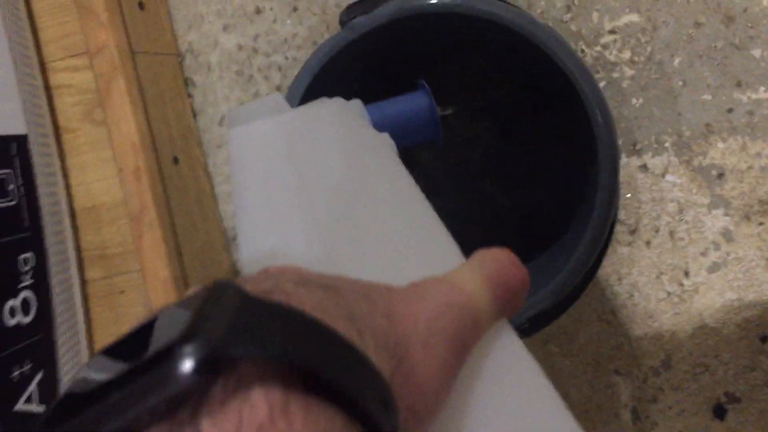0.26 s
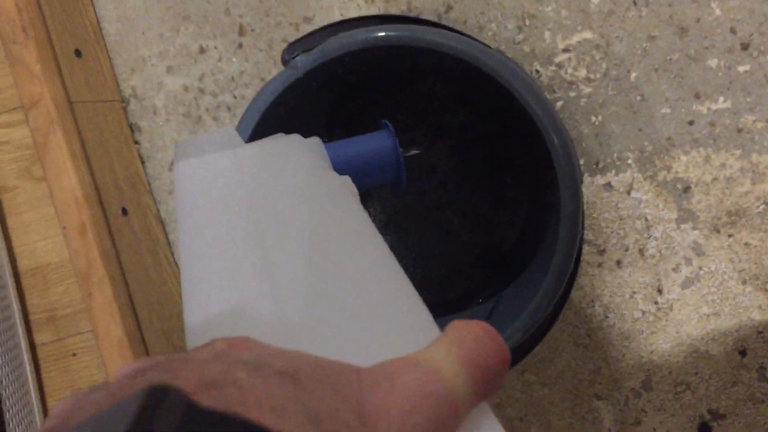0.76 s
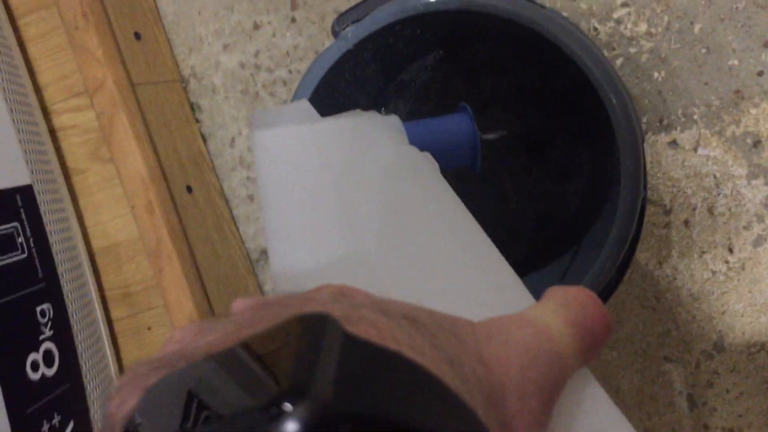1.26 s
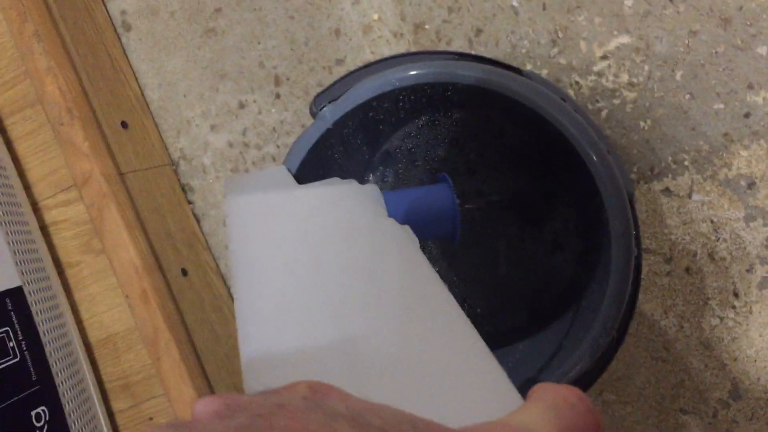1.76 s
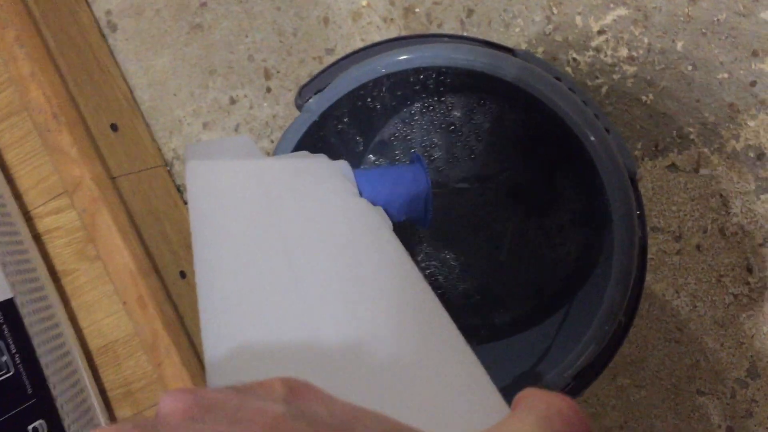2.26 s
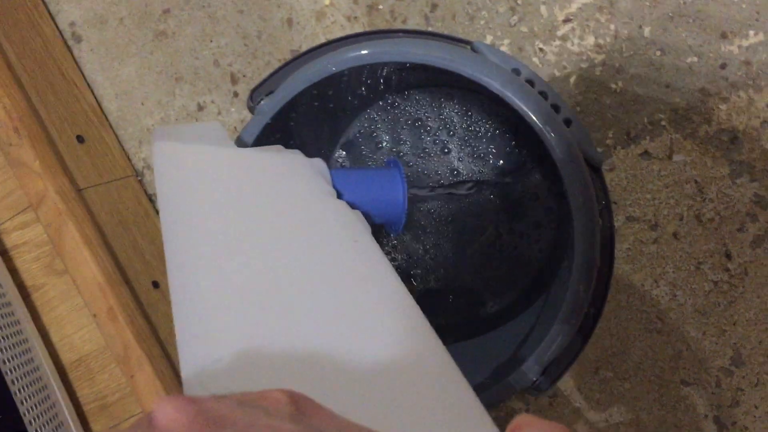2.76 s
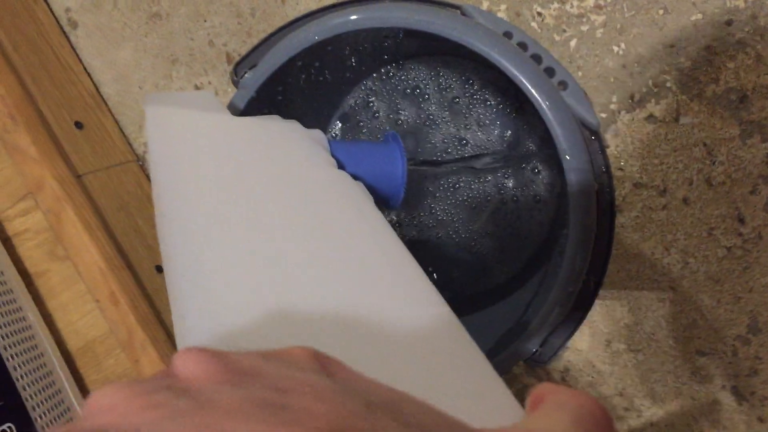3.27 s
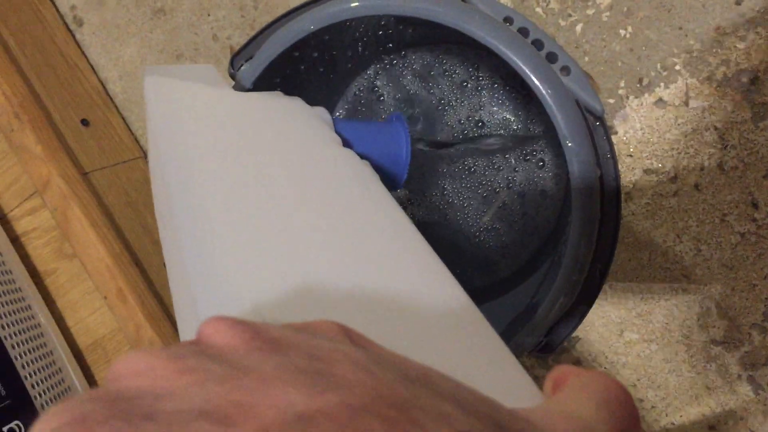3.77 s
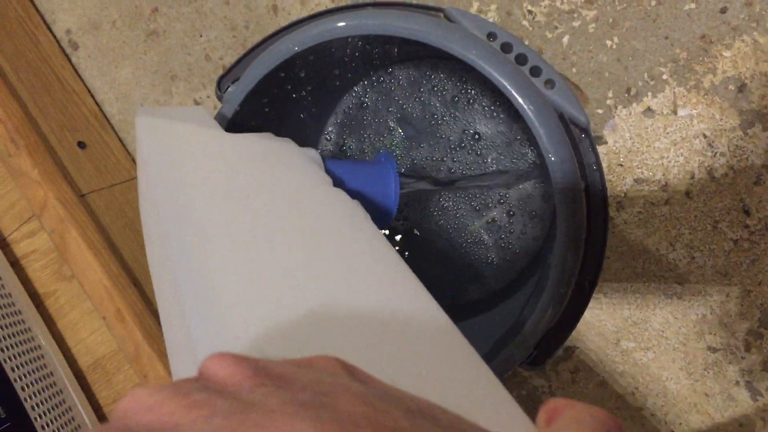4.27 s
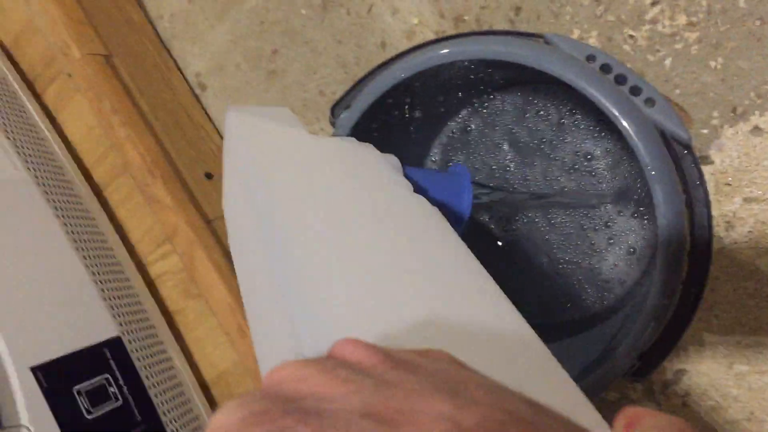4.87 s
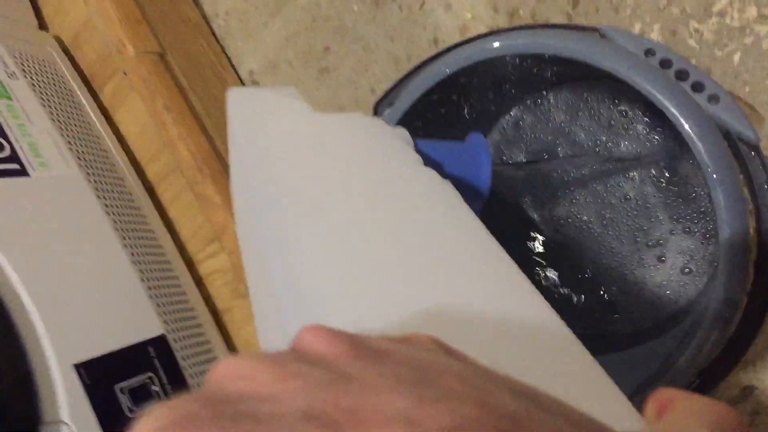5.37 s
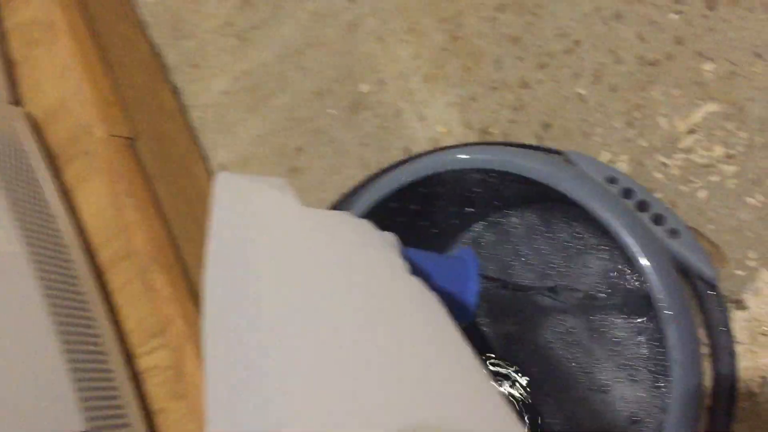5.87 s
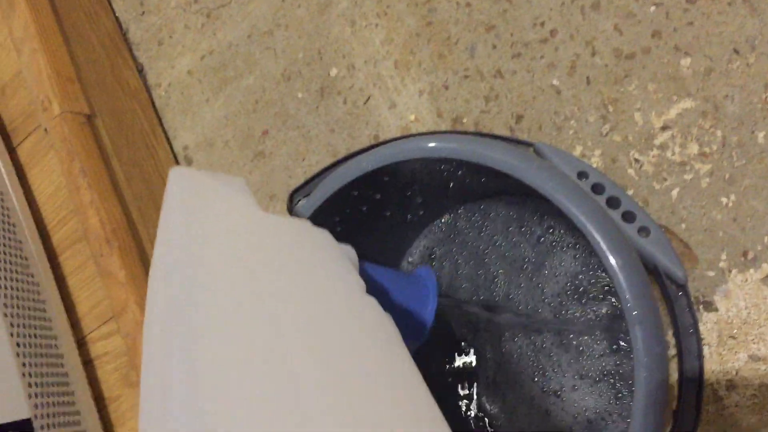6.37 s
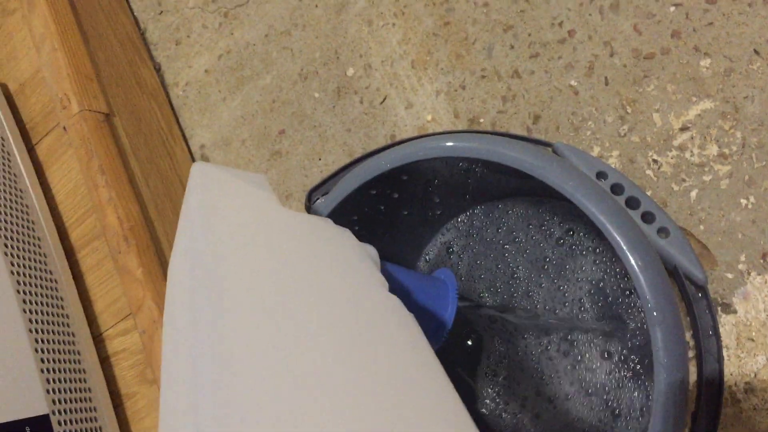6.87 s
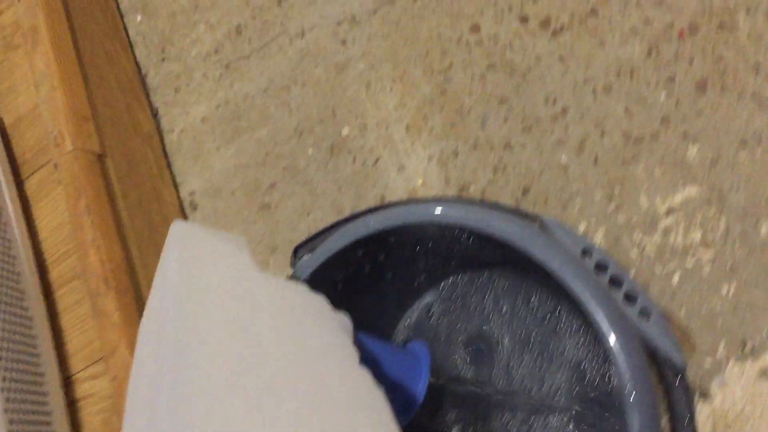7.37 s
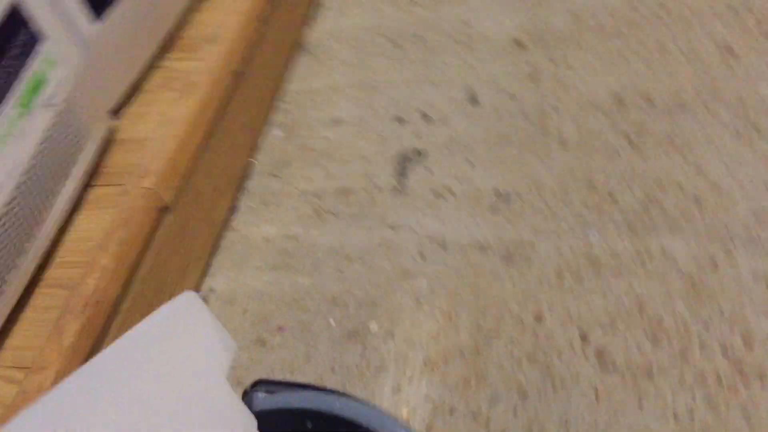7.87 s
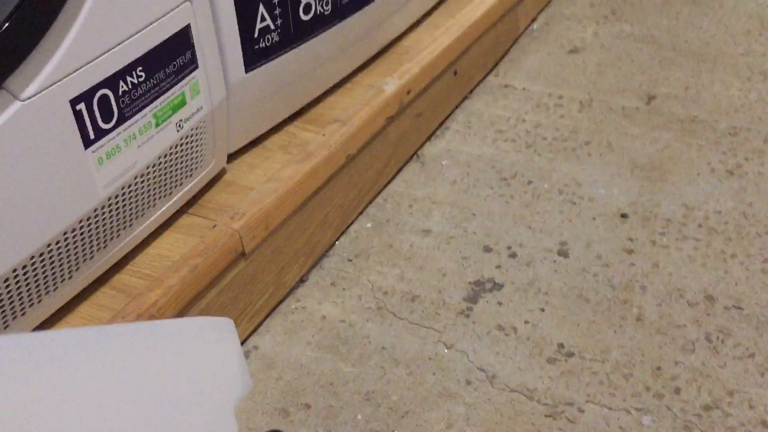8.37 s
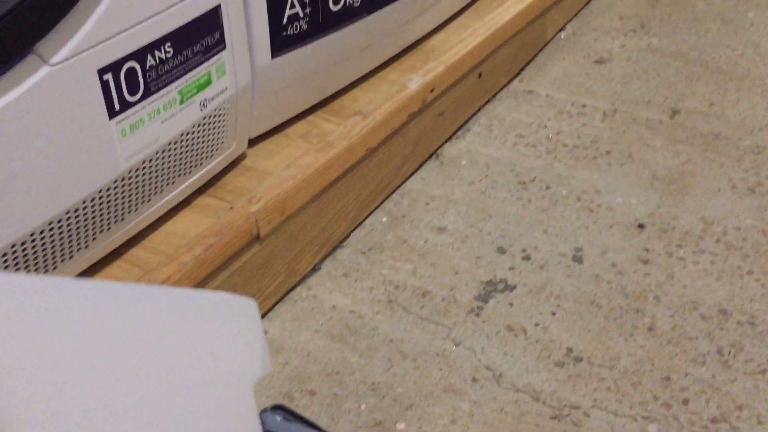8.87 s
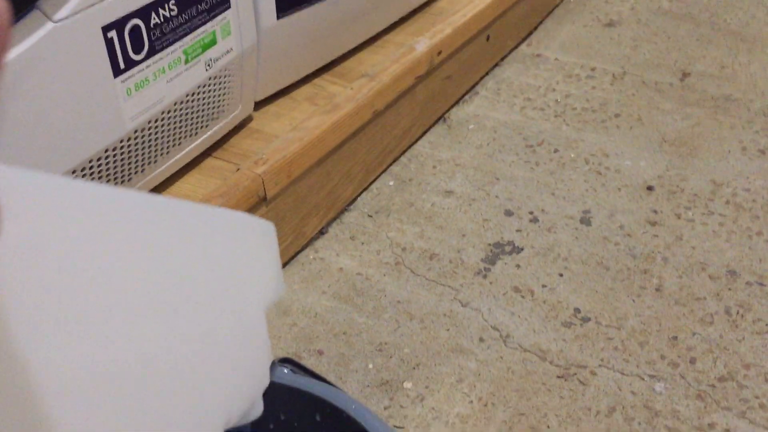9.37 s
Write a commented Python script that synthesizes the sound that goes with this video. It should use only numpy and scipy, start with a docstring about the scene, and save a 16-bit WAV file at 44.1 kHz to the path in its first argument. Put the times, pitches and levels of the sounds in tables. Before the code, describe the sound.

Close indoor pouring: splashy spurts rattle on a bare bucket bottom, become a gurgling trickle with rising bubbles, and break up into plopping drops.

```python
"""A broken dribble of water patters on the bare bottom of a plastic bucket on a concrete floor indoors.
Poured from a hollow plastic tank, it thickens to a stream and thins out to single drips.
Impacts throw decaying noise as spray and trap bubbles, each a decaying sine of rising pitch.
Two-pole resonances give the air modes of the bucket; low noise bursts give the bumps of the tank."""
import sys
import numpy as np
from scipy import signal
from scipy.fft import rfft, irfft, next_fast_len
from scipy.io import wavfile

SR = 44100
rng = np.random.default_rng(int(sys.argv[2]) if len(sys.argv) > 2 else 0)


def to_wav(sig):
    """Store sig (one row per channel, or 1-D mono) as 16-bit WAV at the path in sys.argv[1].

    Samples outside -1..1 are clipped; the rate is SR.
    """
    pcm = np.clip(np.atleast_2d(sig), -1, 1) * 32767
    pcm = np.round(pcm).astype(np.int16)
    wavfile.write(sys.argv[1], SR, pcm.T)  # frames by channels


N = 424683
T = np.arange(N) / SR   # time, s
TOP_HZ = .45 * SR   # highest band edge

# All source levels below hold before the colouring and the room.
# Steady part of the pour: [t/s, babble level/dB, fine spray level/dB]
FLOW = [(0.0, -50, -57.5), (0.35, -51, -59.5), (0.54, -49, -56.5), (0.749, -50, -60), (1.12, -50, -56.5),
        (1.71, -62.5, -68.5), (2.25, -52, -58.5), (3.86, -50, -57.5), (4.321, -52, -61), (4.64, -49, -55.5),
        (5.099, -53.5, -63), (5.58, -49, -53.5), (5.74, -52, -53.5), (6.84, -51, -59), (7.67, -54, -57),
        (8.29, -54, -73), (9.09, -70, -75), (9.63, -62, -53.5)]
FULL_FLOW_DB = -50   # babble level of the full stream
CALM_DB = 19   # this far under full flow the surface is calm: bubbles of large drops ring longer, chirp further
# Swells of the stream as the tank sloshes: [t/s at the crest, length/s, gurgle change/dB, splashing change/dB]
SURGES = [(0.143, 0.14, 10.5, 3.5), (0.52, 0.28, 15, 2.5), (0.73, 0.035, -6, 2.5), (1.006, 0.091, 5, 3.5),
          (1.38, 0.5, 1, 2.5), (1.93, 0.17, 0.5, 4), (2.447, 0.31, 12.5, 2.5), (2.99, 0.42, 6, 1),
          (3.445, 0.32, 8, 2.5), (3.815, 0.17, 14.5, 3), (4.09, 0.25, 12, 3.5), (4.79, 0.21, 19, 6),
          (5.363, 0.34, 16, 2), (5.65, 0.3, 15.5, 4), (6.26, 0.39, 8.5, 5.5), (6.535, 0.19, -1, 1),
          (6.95, .34, 9, 4), (7.425, 0.31, 10.5, 4.5), (7.693, 0.29, 18, 8), (8.18, 0.25, 21, 4),
          (8.52, 0.26, 1, 8.5), (8.76, .17, -15, 11.5), (9.102, 0.12, 4, 14.5), (9.506, 0.21, 18, 0)]
# Moments when the stream breaks off: [t/s in the middle, length/s]
GAPS = [(0.267, 0.079), (0.851, 0.062), (1.584, 0.052), (2.075, 0.06), (8.648, 0.14), (8.939, 0.14),
        (9.198, 0.1), (9.412, 0.03)]
GAP_DB = -11   # change of gurgle and splashing in mid-gap
SPRAY_SHARE, DRUM_SHARE = 0.53, 0.82   # share of a dB change in the spray (splashing) and deepest mode (gurgle)

# Lumps of water: rate at full flow (1/s), share of the flow's dB swing that changes the rate
IMPACTS_PER_S, IMPACTS_FOLLOW = 205, .35
GURGLE_DB, GURGLE_FOLLOWS = -62.5, 0.65   # big bubbles at full flow; share of the flow's dB swing
BABBLE_DB, SPRAY_DB = 4.5, 2   # over their flow curves
SHALLOW_OCTAVES, FILL_S = 0.87, 2.94   # shallow water: raised lowest bubble pitch, time constant of its fading
CHURN_DB, CHURN_T60_S = -7.5, .07   # torn water, against the babble at full flow; its decay time
MIST_DB, MIST_T60_S = -6.5, .03   # puffs of fine spray, against the spray level; their decay time
HISS_DB = -9   # bursting froth at full flow, against the spray level
THUD_DB = -78   # thud of air pushed by the lumps at full flow
# Spectrum of the running water: [f/Hz, gain/dB]
WATER = [(150, 12), (330, 4), (550, -1), (850, -5), (1300, -2), (1900, -0.5), (3300, 1), (4800, -7),
         (6800, -2.5), (8000, -4), (9200, -2.5), (10400, -9), (12000, -1.5), (15500, 0)]

# Modes of the bare bucket bottom: [f/Hz, width/Hz, gain/dB]
BOTTOM = [(1087, 84, -3), (1720, 98, -1), (2650, 170, -36)]
BOTTOM_DB, COVER_DB_PER_S = 2, 8   # level over the flow at first; its fall as water covers the bottom
# Higher air modes of the bucket: [f/Hz, width/Hz, gain relative to the direct sound/dB]
BUCKET = [(757, 52, 0.5), (1042, 63, 15), (1156, 200, 6), (1508, 168, 11.5), (1632, 74, 14),
          (2107, 390, 2.5), (2800, 290, -1.5), (3750, 560, 5)]
# Drumming of the stream on the deepest air mode, stronger as the bucket fills, weak in drips: [t/s, level/dB]
DEPTH = [(0, -74), (1.9, -68), (3.5, -61), (5.0, -61.5), (5.7, -58.5), (8.28, -59.5), (8.4, -83),
         (9.63, -90)]
DEEP_HZ, DEEP_WIDTH_HZ = 403, 26   # the deepest air mode
DRUM_DB, GLUG_BOOM_DB, PLOP_BOOM_DB = -9.0, -7.0, -21.5   # its drive: over DEPTH, a glug, a large drop
SLOSH_OCTAVES = .04   # scatter of its pitch from blow to blow as the surface heaves

# Bumps of the hollow tank: [t/s, peak level/dB, f/Hz, t60/s, wall rattle relative to the bump/dB]
BUMPS = [(0.024, -54.5, 132, 0.4, 8), (1.079, -37, 260, 0.21, -4), (1.108, -47, 181, 0.1, -18),
         (1.112, -50, 100, 0.12, -20), (2.38, -56, 226, 0.23, -15), (3.92, -57, 160.4, 0.28, -15),
         (4.128, -40, 224.2, 0.21, -1), (4.185, -45, 205.2, 0.18, -20), (5.273, -50.5, 129.3, 0.053, 14),
         (5.314, -47.5, 135, 0.1, -6), (7.798, -52, 258, 0.067, -11), (7.969, -55, 133.8, 0.083, -18)]
# Sharpest droplet ticks: [t/s, reference level/dB, f/Hz]
TICKS = [(0.0618, -31.5, 5900), (0.15, -30, 13300), (0.3444, -26, 9670), (0.4324, -22.5, 7600),
         (0.4567, -24, 13500), (0.4827, -19, 7600), (0.521, -30, 13120), (0.5363, -24.5, 6353),
         (0.604, -28, 6330), (0.637, -27, 14900), (0.7161, -18, 6300), (0.899, -33, 5850),
         (1.003, -32, 6740), (1.03, -32, 4680), (1.19, -32.5, 8910), (1.3314, -25, 8550),
         (1.3972, -34, 14200), (1.535, -38, 8100), (1.972, -32.5, 9300), (1.9878, -32.5, 5430),
         (2.152, -32.5, 9100), (2.205, -35, 9060), (2.4268, -28, 8490), (2.4606, -27, 9050),
         (2.476, -32, 12060), (2.493, -31, 11800), (2.569, -32, 8200), (2.632, -32, 8530),
         (2.85, -30, 11970), (3.335, -31, 7330), (3.493, -33, 6790), (3.785, -29.5, 9110),
         (3.8143, -29.5, 8240), (3.947, -30, 8740), (3.968, -30, 9480), (5.162, -31.5, 7720),
         (5.4232, -29, 12620), (5.536, -25.5, 12370), (5.691, -22, 12970), (5.732, -34, 8306),
         (6.281, -29, 6844), (6.415, -29.5, 8510), (6.6936, -28, 5956), (7.049, -26.5, 7000),
         (7.0978, -27.5, 11600), (7.2386, -27.5, 8500), (7.386, -29.5, 8345), (7.4799, -26.5, 6020),
         (7.6869, -28.5, 11410), (7.732, -32, 6230), (8.489, -36.5, 8890), (8.861, -40, 4700),
         (9.026, -38.5, 5800), (9.038, -40, 5123), (9.256, -36.5, 5070), (9.453, -33, 8530),
         (9.5307, -20.5, 11900), (9.6225, -28.5, 4920)]
STRAY_TICKS_PER_S, STRAY_TICK_DB = 4.5, 15.5   # lesser ticks: rate, mean level over the spray

# Largest drops: [t/s, reference level/dB, bubble f/Hz, splash level before its gain/dB]
PLOPS = [(0.0674, -28, 1800, -55.5), (0.1197, -28, 1070, -58), (0.143, -31, 1680, -52),
         (0.1818, -32.5, 1070, -35.5), (0.292, -40, 1740, -44), (0.3477, -26, 1810, -52),
         (0.403, -31, 1090, -44), (0.4584, -22, 1760, -31), (0.473, -18.5, 1686, -51),
         (0.509, -26.5, 1660, -54), (0.5716, -28, 1160, -57), (0.604, -18.5, 2860, -24.5),
         (0.6387, -21, 1800, -40), (0.699, -36, 1700, -58), (0.7403, -27, 1540, -58),
         (0.8845, -34, 3600, -34), (0.957, -28, 1760, -31), (1.04, -27.5, 2380, -35),
         (1.3324, -27.5, 1680, -47), (1.426, -36, 2500, -47.5), (1.5512, -36, 2630, -60),
         (1.637, -40, 1704, -40), (1.823, -37, 1610, -49), (1.8925, -31.5, 1730, -43.5),
         (1.933, -35, 2424, -44), (1.9887, -32.5, 2370, -50), (2.16, -39, 1650, -45),
         (2.2682, -33.5, 994, -40.5), (2.358, -27, 2130, -38), (2.741, -32, 1660, -41),
         (2.824, -22.5, 1554, -36), (3.007, -28, 1645, -48), (3.294, -33, 1600, -58),
         (3.5044, -22, 1690, -42), (3.6044, -27, 1572, -53), (3.7874, -31.5, 1560, -38.5),
         (3.811, -30, 1483, -46), (3.969, -27.5, 1813, -40), (4.183, -31, 1609, -61),
         (4.2374, -27.5, 1670, -50), (4.344, -30.5, 1524, -47), (4.4677, -30.5, 1743, -39),
         (4.708, -28, 2314, -56), (5.055, -31.5, 1562, -50), (5.1567, -36, 1016, -59),
         (5.3957, -29, 1089, -41), (5.536, -29.5, 1277, -39.5), (5.622, -22.5, 3246, -52),
         (5.677, -34, 1054, -46), (5.732, -30.5, 1380, -45), (5.78, -29.5, 1520, -56),
         (6.0734, -31.5, 1597, -37.5), (6.176, -26.5, 1539, -33), (6.226, -28, 1684, -37),
         (6.4361, -27.5, 1192, -48), (6.488, -23, 1727, -45), (6.526, -19, 1555, -44),
         (6.5529, -27, 1127, -44), (6.704, -33.5, 1642, -37), (6.736, -33.5, 1099, -60),
         (6.815, -32, 1500, -41.5), (7.073, -30.5, 1446, -65), (7.124, -28, 1640, -42),
         (7.367, -29.5, 2027, -33), (7.4238, -23.5, 1405, -39), (7.482, -29.5, 1133, -41),
         (7.579, -21.5, 1500, -28), (7.652, -24, 1551, -61), (7.671, -26.5, 1688, -63),
         (7.76, -30.5, 1632, -38), (7.779, -30, 2820, -53), (7.9923, -23.5, 1550, -47.5),
         (8.066, -37, 1650, -38.5), (8.0969, -28, 1120, -39), (8.1242, -33, 1636, -50),
         (8.153, -27.5, 1504, -54), (8.1664, -27, 1068, -47), (8.175, -26, 1630, -61),
         (8.222, -30, 1150, -63), (8.2821, -24.5, 1107, -62), (8.321, -33, 1710, -69),
         (8.427, -38, 3600, -47), (8.459, -36.5, 1049, -47), (8.523, -38, 1615, -42),
         (8.5544, -35, 1026, -44), (8.577, -38.5, 995, -37.5), (8.742, -37, 1652, -60),
         (8.7778, -38.5, 1700, -48.5), (8.795, -51, 1750, -58), (8.8381, -54, 3890, -38),
         (8.862, -39, 1012, -60), (8.978, -43, 3270, -45), (9.0068, -40.5, 1756, -41),
         (9.0636, -31.5, 2007, -39), (9.098, -32.5, 1434, -53), (9.1201, -32.5, 1050, -46),
         (9.1885, -44, 1594, -60), (9.2622, -28, 1540, -45), (9.2812, -37.5, 3160, -41),
         (9.32, -35, 3443, -38), (9.3468, -25, 1664, -44.5), (9.3727, -27, 1110, -71),
         (9.449, -37.5, 3710, -48), (9.457, -34, 1350, -52), (9.473, -30, 1100, -64),
         (9.4834, -30, 3010, -45), (9.4938, -23.5, 916, -53), (9.505, -37, 2080, -62),
         (9.5835, -28.5, 2813, -45.5), (9.622, -41.5, 1742, -31.5)]
PLOP_DB, PUSH_DB, SPLASH_DB = -3, -18.5, 16.5   # ring and air push against the drop's level; splash gain
SLAP_DB = -4.5   # slap on rough water, against its bubble
SPATTER_DB, CALM_SPATTER_DB = -18, 5   # following bubbles, against the drop's level; extra on calm water
STRAY_PLOPS_PER_S = 8.0   # rate of lesser drops
STRAY_PLOP_DB, STRAY_SPLASH_DB = 12.5, -10.5   # their mean level over the flow; splash column under that level
PLOP_HZ, PLOP_SPREAD_OCTAVES = 1650, 0.5   # centre and scatter of their pitches

# Sheets of water that slap down and tear: [t/s at the crest, length/s, level/dB]
SHEETS = [(0.423, 0.059, -38), (2.868, 0.032, -47.5), (3.01, 0.03, -57), (3.375, 0.044, -44.5),
          (4.783, 0.15, -43), (5.622, 0.065, -43), (6.9, 0.05, -43), (7.59, 0.043, -45.5)]
SHEET_BUBBLES_PER_S = 1600
# Pockets of air gulped under the surface: [t/s, reference level/dB, f/Hz]
GLUGS = [(0.458, -29, 916), (0.496, -29.5, 660), (0.549, -34, 690), (0.567, -34.5, 585), (0.583, -40, 580),
         (2.493, -37.5, 575), (2.851, -40.5, 539.6), (3.007, -41.5, 535), (3.367, -41, 474.4),
         (3.576, -47.5, 443), (4.523, -46, 438), (5.154, -41.5, 434), (5.633, -32, 898),
         (5.664, -28.5, 1014), (5.804, -35.5, 971), (5.847, -33.5, 679), (6.228, -38.5, 914),
         (6.347, -42.5, 737), (6.808, -38, 934), (6.881, -39, 924), (7.009, -38.5, 740),
         (7.423, -39.5, 940), (7.48, -45, 430), (7.579, -35, 756), (7.746, -38.5, 779), (8.219, -39.5, 438),
         (8.278, -34, 970), (9.562, -34, 771)]

# Spectrum of the room air: [f/Hz, relative density/dB per Hz]
AIR = [(22, -20), (55, -2.5), (150, -2.5), (280, -3.5), (450, -10), (800, -15), (1500, -16), (5000, -14),
       (16000, -22.5)]
AIR_DB = -71.5   # rms level
SWAY_S = .09   # interval between new echo patterns
CUTOFF_HZ = 16000


def from_db(db):
    """Level law: decibels to amplitude gain."""
    return 10 ** (np.asarray(db) / 20)


def rms_one(x):
    """Power normalisation: scale to unit rms."""
    return x / np.sqrt(np.mean(x ** 2) + 1e-20)


def peak_one(x):
    """Amplitude normalisation: scale to unit peak."""
    return x / (np.abs(x).max() + 1e-20)


def add(out, s, sound):
    """Superposition: mix a sound in at a time."""
    at = int(np.clip(s * SR, 0, N))
    out[at:at + len(sound)] += sound[:N - at]


def band(x, low_hz, high_hz):
    """Band limitation: a Butterworth band-pass, its upper edge held to TOP_HZ."""
    edges = [low_hz, min(high_hz, TOP_HZ)]
    return signal.sosfilt(signal.butter(2, edges, "band", fs=SR, output="sos"), x + 1e-18)


def coloured(x, spectrum):
    """Spectral shaping: a gain interpolated over log frequency."""
    hz, db = np.transpose(spectrum)
    size = next_fast_len(N + SR)
    bins = np.maximum(np.fft.rfftfreq(size, 1 / SR), 1)
    gain = from_db(np.interp(np.log(bins), np.log(hz), db))
    return irfft(rfft(x, size) * gain, size)[:N]


def resonance(x, hz, width_hz):
    """Simple resonance: a two-pole filter with a gain of 1 on top."""
    r = np.exp(-np.pi * width_hz / SR)
    poles = [1, -2 * r * np.cos(2 * np.pi * hz / SR), r * r]
    return (1 - r * r) / 2 * signal.lfilter([1, 0, -1], poles, x + 1e-18)


def bucket(x):
    """Modal superposition: direct sound plus the ringing air modes of the bucket."""
    return x + sum(from_db(db) * resonance(x, hz, width_hz) for hz, width_hz, db in BUCKET)


def burst(t60, size=16384):
    """Exponential decay: noise that falls 60 dB in t60."""
    return rng.standard_normal(size) * from_db(-60 * T[:size] / t60)


def bubble(hz, cycles, rise, swell, size):
    """Bubble oscillation: swells, decays 60 dB in `cycles` and rises in pitch as it nears the surface."""
    turns = hz * T[:size]
    age = turns / cycles
    tone = np.sin(2 * np.pi * turns * (1 + rise * np.minimum(age, 2) / 2))
    return tone * (1 - np.exp(-turns / swell)) * np.exp(-np.log(1000) * age)


def flow_at(s):
    """Flow dependence: levels of the babble and of the spray at given times."""
    times, babble_db, spray_db = np.transpose(FLOW)
    return np.interp(s, times, babble_db), np.interp(s, times, spray_db)


def calm_at(s):
    """Surface agitation: 0 under the full stream, 1 at CALM_DB or more below it."""
    return np.clip((FULL_FLOW_DB - flow_at(s)[0]) / CALM_DB, 0, 1)


def surging():
    """Flow modulation: cosine humps and dips change the gurgle and the splashing in dB."""
    out = np.zeros((2, N))
    gaps = [(s, length_s, GAP_DB, GAP_DB) for s, length_s in GAPS]
    for s, length_s, gurgle_db, splash_db in list(SURGES) + gaps:
        inside = slice(*np.searchsorted(T, [s - length_s / 2, s + length_s / 2]))
        hump = np.cos(np.pi * (T[inside] - s) / length_s)
        out[:, inside] += np.outer([gurgle_db, splash_db], hump)
    return out


def impacts(spread_db):
    """Random arrivals: lumps of water land less often in a thinner flow, and each counts for more."""
    swing_db = flow_at(T)[0] + surging()[1] - FULL_FLOW_DB
    per_s = IMPACTS_PER_S * from_db(IMPACTS_FOLLOW * swing_db)
    due = np.cumsum(np.maximum(per_s, 1)) / SR   # impacts expected so far
    chance = rng.random((4000, 2))[:int(due[-1])]
    times = np.interp(np.arange(len(chance)) + 2 * chance[:, 0], due, T)
    strengths = from_db(spread_db * (2 * chance[:, 1] - 1)) / np.sqrt(np.interp(times, T, per_s))
    return times, strengths


def puffs(times, strengths, t60):
    """Addition of powers: every impact sets off decaying noise; the sum has rms 1."""
    power = np.zeros(N)
    np.add.at(power, np.clip(times * SR, 0, N - 1).astype(int), strengths ** 2)
    power = signal.lfilter([1], [1, -from_db(-120 / (t60 * SR))], power + 1e-18)
    return rms_one(np.sqrt(power) * rng.standard_normal(N))


def swarm(times, strengths, low_hz, high_hz, cycles, rise, swell, lag_s, spread_db, tilt_db, count,
          shallow=0):
    """Air entrainment: each impact traps `count` random bubbles, up to lag_s after it lands."""
    out = np.zeros(N)
    chance = rng.random((4000, count, 4))
    for s, strength, draws in zip(times, strengths, chance):
        # shallow water traps only the smaller bubbles; this limit fades with time
        lowest_hz = low_hz * 2 ** (shallow * np.exp(-s / FILL_S))
        for small, late, loud, long in draws:
            hz = lowest_hz * (high_hz / lowest_hz) ** small
            life = cycles * (.5 + long)
            level_db = spread_db * (2 * loud - 3) + tilt_db * np.log2(hz / low_hz)   # tilt per octave
            sound = bubble(hz, life, rise * long, swell, size=int(life * SR / hz) + 2)
            add(out, s + lag_s * late, strength * from_db(level_db) * sound)
    return out


def stream():
    """Common excitation: the same impacts drive thuds, gurgle, babble, fizz and spray over an even hiss."""
    flow_db, mist_db = flow_at(T)
    swing_db = flow_db - FULL_FLOW_DB
    plunge_db, splash_db = surging()
    gurgle_db = GURGLE_DB + GURGLE_FOLLOWS * swing_db + plunge_db
    babble_db = flow_db + BABBLE_DB + splash_db
    spray_db = mist_db + SPRAY_DB + SPRAY_SHARE * splash_db
    times, strengths = impacts(spread_db=13.5)
    gurgle = swarm(times, strengths, 484, 1031, cycles=22.0, rise=0.24, swell=0.49, lag_s=0.012,
                   spread_db=3.0, tilt_db=7.0, count=2)
    # the bubbles of the babble ring on for many cycles and glide up in pitch
    babble = swarm(times, strengths, 930, 5000, cycles=34.0, rise=.26, swell=3.2, lag_s=.024,
                   spread_db=6.0, tilt_db=2.0, count=11, shallow=SHALLOW_OCTAVES)
    fizz = swarm(times, strengths, 4310, 11980, cycles=18.0, rise=0.093, swell=1.6, lag_s=.005,
                 spread_db=2.5, tilt_db=3.0, count=3)
    crackle = swarm(times, strengths, 4560, 13000, cycles=9.0, rise=0.083, swell=1.2, lag_s=.006,
                    spread_db=14.5, tilt_db=-1.5, count=2)
    churn = band(puffs(times, strengths, CHURN_T60_S), 920, 5700)
    mist = band(puffs(times, strengths ** 2, MIST_T60_S), 3900, 17400)
    hiss = band(rng.standard_normal(N), 3600, TOP_HZ)
    thuds = band(puffs(times, strengths ** 2, CHURN_T60_S), 180, 690)

    low = from_db(THUD_DB + swing_db + splash_db) * rms_one(thuds)
    low += from_db(gurgle_db) * rms_one(bucket(gurgle))
    froth = rms_one(babble) + from_db(CHURN_DB + swing_db) * rms_one(churn)
    middle = from_db(babble_db) * rms_one(bucket(froth))
    spray = from_db(1.5) * rms_one(fizz) + from_db(-2.5) * rms_one(crackle)
    spray += from_db(MIST_DB) * rms_one(mist) + from_db(HISS_DB + swing_db) * rms_one(hiss)
    high = from_db(spray_db) * spray
    return coloured(band(low + middle + high, 110, TOP_HZ), WATER)


def patter():
    """Impulse excitation: water striking the bare plastic rings the bottom, less as water covers it."""
    blows = np.zeros(N)
    for s, strength in zip(*impacts(spread_db=12.0)):
        add(blows, s, strength * rng.choice([-1, 1], 1))
    ringing = rms_one(sum(from_db(db) * resonance(blows, hz, width_hz) for hz, width_hz, db in BOTTOM))
    level_db = flow_at(T)[0] + surging()[1] + BOTTOM_DB - COVER_DB_PER_S * T
    return from_db(level_db) * band(ringing, 1020, 3700)


def drumming():
    """Air-column resonance: the deepest mode murmurs under the stream and booms at glugs and large drops."""
    depth_s, depth_db = np.transpose(DEPTH)
    depth_db = np.interp(T, depth_s, depth_db)
    lumps = puffs(*impacts(spread_db=36.0), t60=.01)
    murmur = rms_one(resonance(band(lumps, 383, 454), DEEP_HZ, DEEP_WIDTH_HZ))
    murmur_db = depth_db + DRUM_DB + DRUM_SHARE * surging()[0]
    t = T[:SR // 2]
    dying = np.exp(-np.pi * DEEP_WIDTH_HZ * t) * (1 - np.exp(-t / 0.0053))
    blows = [(s, db + GLUG_BOOM_DB) for s, db, _ in GLUGS]
    blows += [(s, db + PLOP_BOOM_DB) for s, db, _, _ in PLOPS]
    booms = np.zeros(N)
    for s, db in blows:
        hz = DEEP_HZ * 2 ** (SLOSH_OCTAVES * rng.standard_normal())
        add(booms, s, from_db(db) * dying * np.sin(2 * np.pi * hz * t))
    return from_db(murmur_db) * murmur + booms * from_db(depth_db - depth_db.max())


def tank():
    """Damped shell vibration: dull hollow bumps as the tank is tipped, with a short rattle of its wall."""
    out = np.zeros(N)
    for s, db, hz, t60, rattle_db in BUMPS:
        body = band(burst(t60), hz / 1.7, hz * 1.7)
        body = peak_one(band(body, hz / 1.9, hz * 1.8))
        rattle = peak_one(band(burst(t60 * 0.39), 340, 1440))
        add(out, s, from_db(db) * (body + from_db(rattle_db) * rattle))
    return out


def strays(per_s):
    """Random spacing: loosely even times, each with two normal draws for its size and pitch."""
    slot, size, pitch = rng.standard_normal((200, 3)).T
    times = (np.arange(len(slot)) + .5 + slot / 2) / per_s
    keep = (times > 0) & (times < T[-1])
    return times[keep], np.clip(size[keep], -2, 2), np.clip(pitch[keep], -2, 2)


def lesser_ticks(centre_hz, spread_octaves, spread_db):
    """Random arrivals: smaller droplets follow the spray level; same columns as TICKS."""
    times, size, pitch = strays(STRAY_TICKS_PER_S)
    db = flow_at(times)[1] + STRAY_TICK_DB + spread_db * size
    return np.transpose([times, db, centre_hz * 2 ** (spread_octaves * pitch)])


def ticks():
    """Transient impact: a droplet snaps on plastic or water and bursts into mist; tiny bubbles follow."""
    snaps = np.zeros(N)
    droplets = np.vstack([TICKS, lesser_ticks(centre_hz=8600, spread_octaves=0.062, spread_db=7.0)])
    for s, db, hz in droplets:
        snap = bubble(hz, cycles=9.0, rise=.1, swell=1.3, size=512)
        mist = band(burst(0.0085, size=2048), hz / 1.66, hz * 2.1)
        add(snaps, s + 0.001, from_db(db + 3.5) * peak_one(snap))
        add(snaps, s + 0.00033, from_db(db - 1.5) * peak_one(mist))
    times, peak_db, _ = droplets.T
    fizz = swarm(times, from_db(peak_db - 1.0), 6040, 11000, cycles=33.0, rise=0.094, swell=0.64,
                 lag_s=0.0058, spread_db=14.0, tilt_db=-20.0, count=4)
    return band(snaps + fizz, 3300, TOP_HZ)


def lesser_plops(spread_db):
    """Random arrivals: smaller drops follow the flow level; same columns as PLOPS."""
    times, size, pitch = strays(STRAY_PLOPS_PER_S)
    db = flow_at(times)[0] + STRAY_PLOP_DB + spread_db * size
    hz = PLOP_HZ * 2 ** (PLOP_SPREAD_OCTAVES * pitch)
    return np.transpose([times, db, hz, db + STRAY_SPLASH_DB])


def plops():
    """Drop impact: a slap, a push of air, one loud bubble and a few small ones; then spatter falls back."""
    rings, pushes = np.zeros((2, N))
    drops = np.vstack([PLOPS, lesser_plops(spread_db=5.0)])
    for s, db, hz, _ in drops:
        calm = calm_at(s)
        # small bubbles reach the surface sooner and chirp further
        chirp = calm * min(.15 * (hz / 1600) ** 3.5, 1)
        rise = chirp + 0.044 * hz / 1600
        cycles = 23.0 * np.sqrt(hz / 1600) * (1 + chirp + .3 * calm)
        ring = bubble(hz * (1 - .25 * rise), cycles, rise, swell=3.0 + 8 * chirp, size=4096)
        # a calm surface takes the drop softly
        slap = from_db(SLAP_DB) * (1 - calm) * peak_one(band(burst(0.023, size=4096), 800, 8000))
        push = bucket(band(burst(0.063, size=8192), 290, 1480))
        add(rings, s - .0005, from_db(db + PLOP_DB) * peak_one(bucket(peak_one(ring) + slap)))
        add(pushes, s, from_db(db + PUSH_DB) * peak_one(push))
    times, peak_db, _, splash_db = drops.T
    splashes = swarm(times, from_db(splash_db + SPLASH_DB), 2083, 6130, cycles=20.0, rise=0.19, swell=2.4,
                     lag_s=.007, spread_db=3.5, tilt_db=-1.0, count=6)
    spatter_db = peak_db + SPATTER_DB + CALM_SPATTER_DB * calm_at(times)
    spatter = swarm(times + .004, from_db(spatter_db), 1050, 3000, cycles=40.0, rise=0.6, swell=3.0,
                    lag_s=0.045, spread_db=4.0, tilt_db=-5.0, count=5)
    return rings + pushes + splashes + spatter


def sheets():
    """Incoherent superposition: a sheet tears into many small bubbles that overlap into a swell of fizz."""
    swell = np.zeros(N)
    for s, length_s, db in SHEETS:
        add(swell, s - length_s / 2, from_db(db) * signal.windows.hann(int(length_s * SR)))
    tearing = swell > 0
    times = T[tearing & (rng.random(N) < SHEET_BUBBLES_PER_S / SR)]
    crowd = bucket(swarm(times, np.ones(len(times)), 1750, 5000, cycles=28.0, rise=.25, swell=2, lag_s=0,
                         spread_db=5.0, tilt_db=2, count=1))
    return swell * crowd / crowd[tearing].std()


def glugs(ring_db, push_db, wake_db):
    """Cavity closure: an air pocket closes with a low push, rings as a big bubble and leaves a wake of others."""
    out = np.zeros(N)
    for s, db, hz in GLUGS:
        ring = bubble(hz, cycles=36.0, rise=0.041, swell=0.53, size=8192)
        push = bucket(band(burst(0.08, size=8192), 400, 1000))
        add(out, s, from_db(db + ring_db) * peak_one(ring))
        add(out, s, from_db(db + push_db) * peak_one(push))
    times, peak_db, _ = np.transpose(GLUGS)
    wake = swarm(times, from_db(peak_db + wake_db), 413, 1010, cycles=21.0, rise=0.12, swell=1.6, lag_s=.1,
                 spread_db=3.0, tilt_db=-2.5, count=6)
    return out + wake


def room(x, scatter_db, scatter_t60, tail_db, tail_t60):
    """Reverberation: treble scatters between bucket walls, a hard room adds a short tail; echoes keep changing."""
    hop, size = int(SWAY_S * SR), 6144
    starts, t = range(0, N, hop), T[:size]
    scatter, tail = rng.standard_normal((2, len(starts), size))
    scatter = band(scatter, 2500, 15000) * from_db(-60 * t / scatter_t60) * (1 - np.exp(-t / .001))
    tail = band(tail, 150, 9500) * from_db(-60 * t / tail_t60) * (1 - np.exp(-t / .006))
    echoes = from_db(scatter_db) * rms_one(scatter) + from_db(tail_db) * rms_one(tail)
    echoes /= np.sqrt(size)
    out, fade = x.copy(), signal.windows.cosine(2 * hop)
    for at, echo in zip(starts, echoes):
        piece = x[at:at + 2 * hop]
        add(out, at / SR, signal.fftconvolve(piece * fade[:len(piece)], echo))
    return out


def scene():
    """Superposition: water and tank sound in the room, over faint room air."""
    sources = stream() + patter() + drumming() + tank() + ticks() + plops() + sheets()
    sources += glugs(ring_db=-3.0, push_db=-3.0, wake_db=-7.5)
    air = from_db(AIR_DB) * rms_one(coloured(rng.standard_normal(N), AIR))
    wet = room(sources, scatter_db=-8.5, scatter_t60=0.013, tail_db=-13.5, tail_t60=0.14)
    return (wet + air)[None]


def record(dry):
    """Low-pass filtering: an elliptic filter cuts the top steeply."""
    return signal.sosfilt(signal.ellip(10, .1, 70, CUTOFF_HZ, fs=SR, output="sos"), dry)


dry = scene()
out = record(dry)
to_wav(out)
```